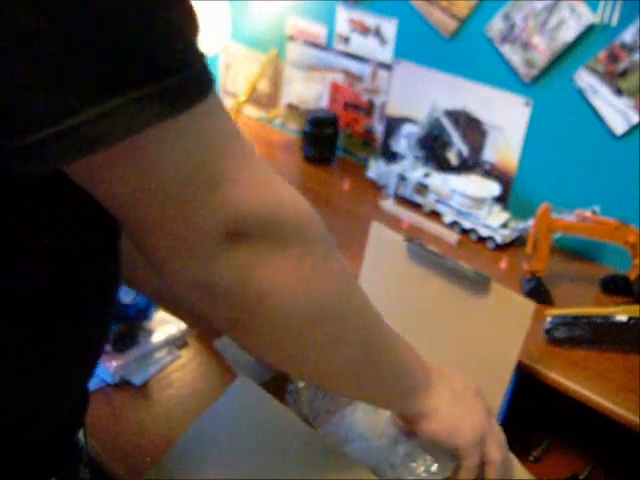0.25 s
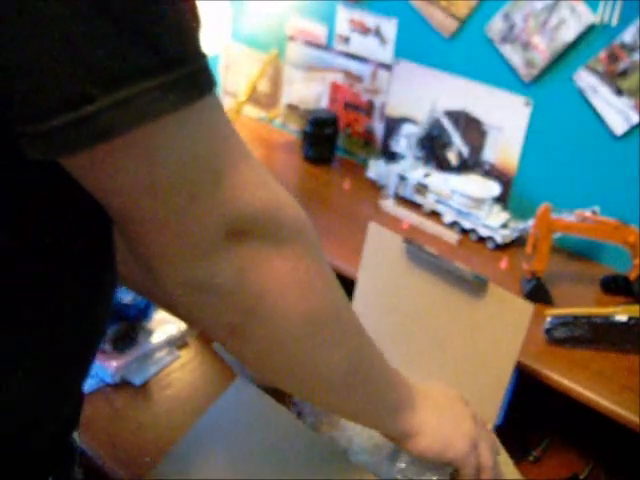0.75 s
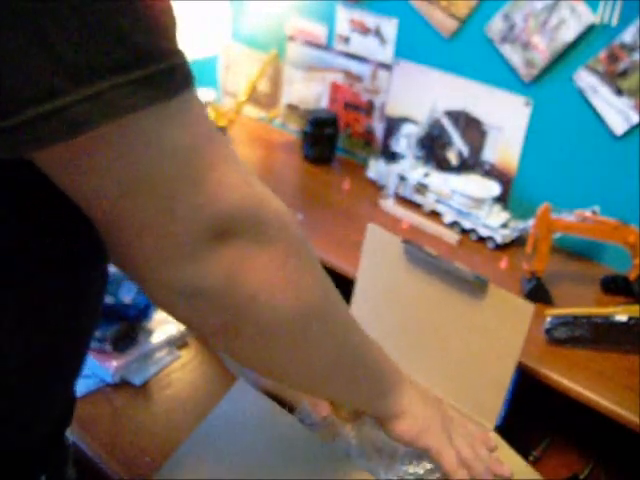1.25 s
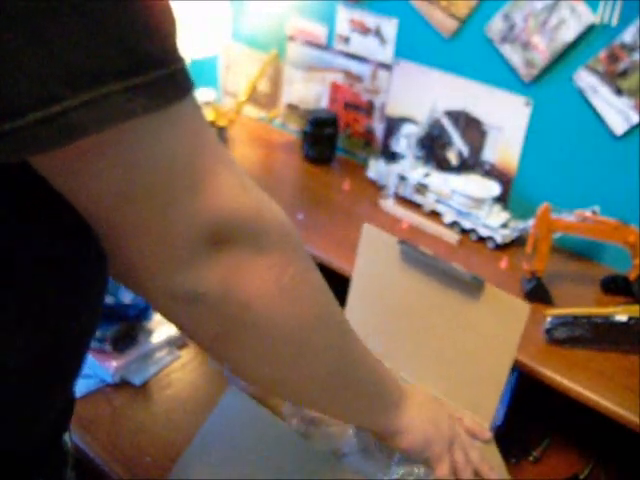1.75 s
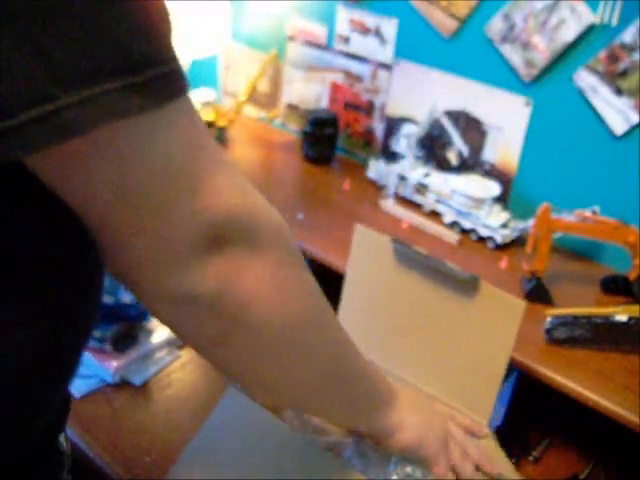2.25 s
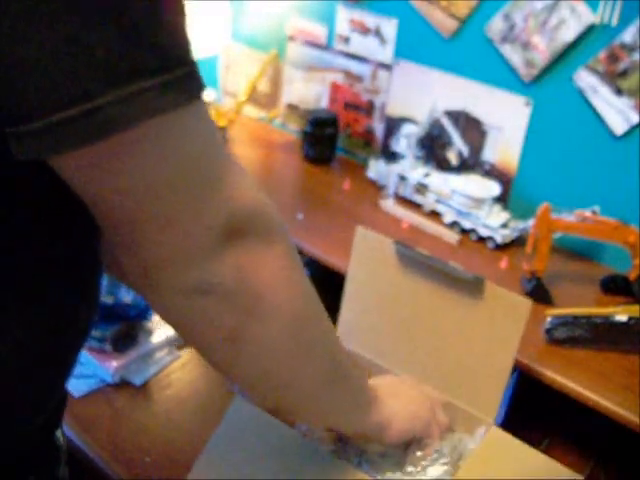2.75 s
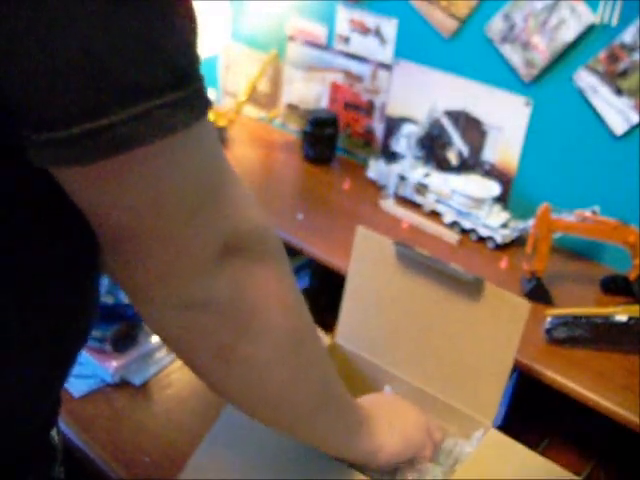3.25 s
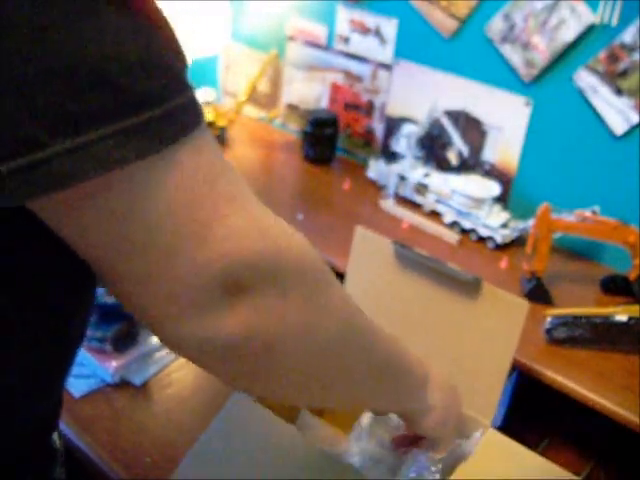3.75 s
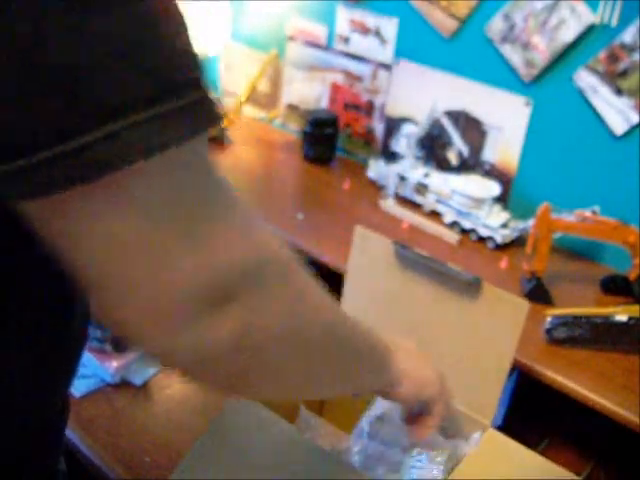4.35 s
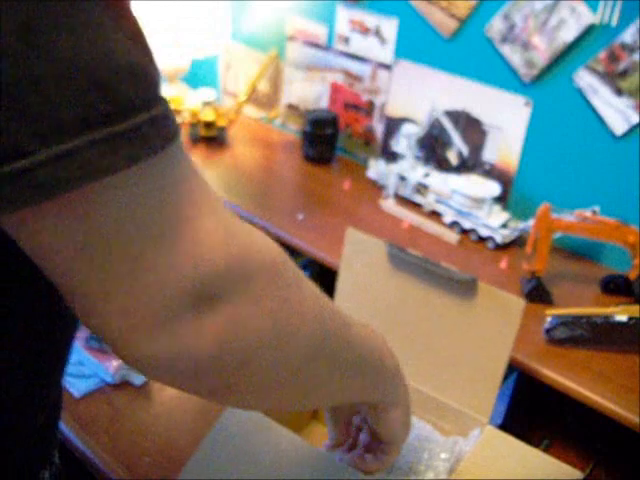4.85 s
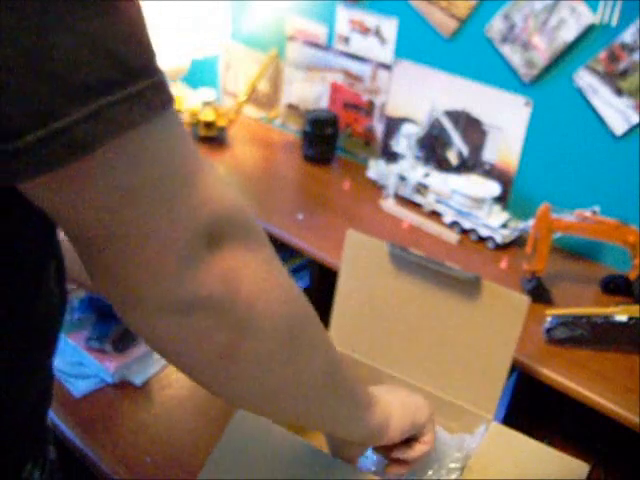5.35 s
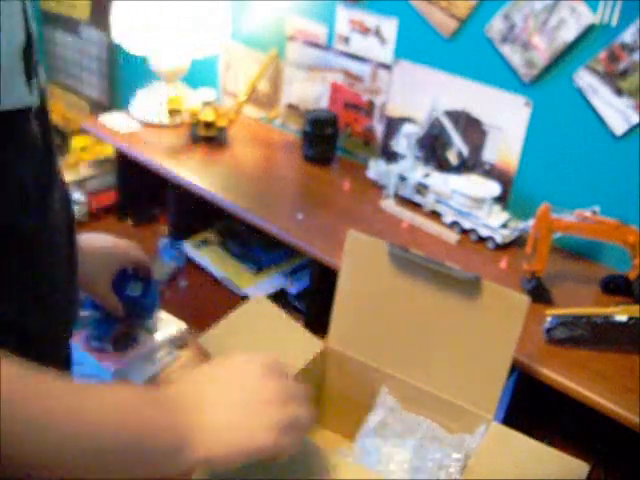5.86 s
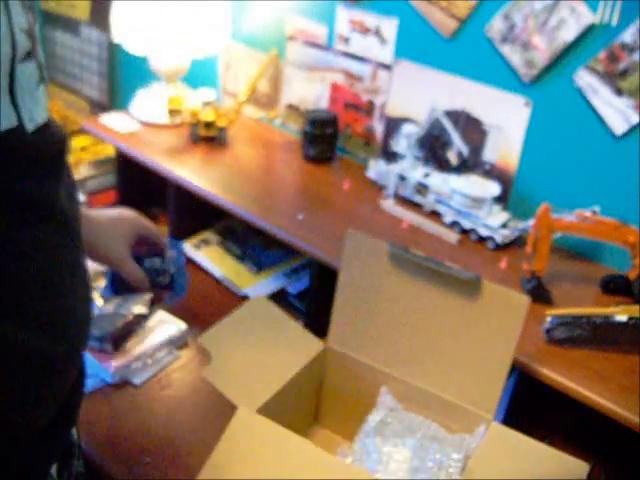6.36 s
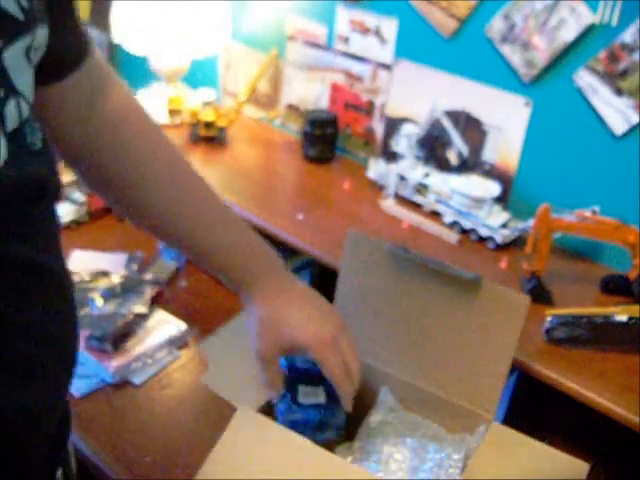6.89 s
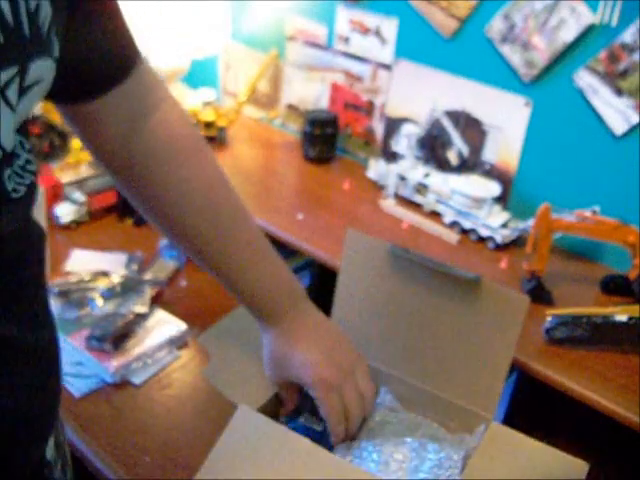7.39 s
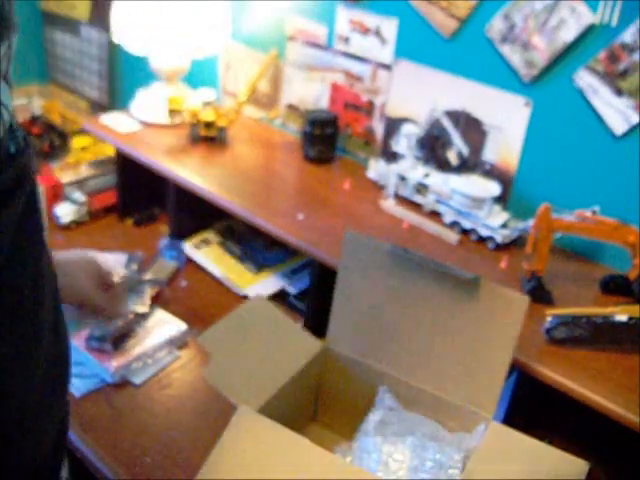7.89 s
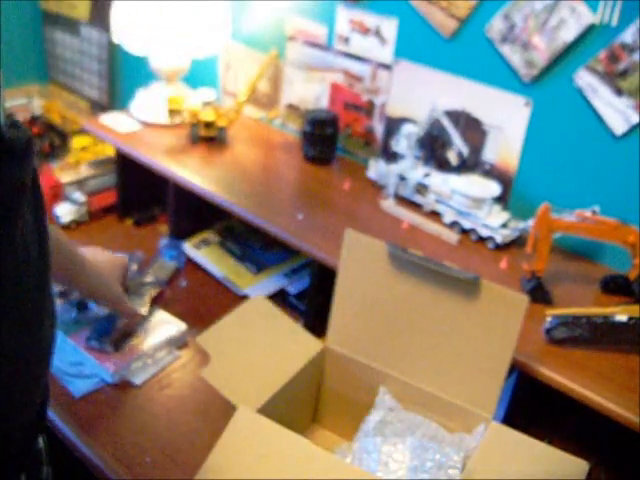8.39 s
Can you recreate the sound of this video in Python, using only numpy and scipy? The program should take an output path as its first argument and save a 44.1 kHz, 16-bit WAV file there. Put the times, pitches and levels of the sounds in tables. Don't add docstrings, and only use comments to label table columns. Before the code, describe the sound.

Plastic film creases and pops at arm's length, in uneven squeezes mixed with dull knuckle taps and rubbing on hollow cardboard. After a near-silent pause with only faint ticks, a crinkly packet touches the box, rustles, and lands with the loudest knock. A faint rustle ends it. Small bedroom, short reverberation, soft hiss and rumble, muffled top end.

```python
import sys
import numpy as np
from scipy import signal
from scipy.fft import rfft, irfft, next_fast_len
from scipy.io import wavfile
from scipy.ndimage import uniform_filter1d, map_coordinates

SR = 44100
rng = np.random.default_rng(int(sys.argv[2]) if len(sys.argv) > 2 else 0)


def generate_wav(signal):
    frames = np.transpose(np.atleast_2d(signal))
    scaled = np.clip(frames, -1, 1) * 32767
    pcm = np.round(scaled).astype(np.int16)
    wavfile.write(sys.argv[1], SR, pcm)


def makeup_ratio(level_db):
    decades = np.asarray(level_db, float) / 20
    return 10 ** decades


N = 380583


def unit(x):
    return x / np.sqrt(np.mean(x ** 2) + 1e-20)


def along(points, hz):
    f, v = np.transpose(points)
    return np.interp(np.log(hz + 1), np.log(f + 1), v)


def curve(rows):
    s, value = np.transpose(rows)
    return np.interp(np.arange(N) / SR, s, value)


def wobble(rate):
    return map_coordinates(rng.standard_normal(N // 100), [np.arange(N) * rate / SR])


def filtered(x, response):
    m = next_fast_len(N + SR // 2)
    return irfft(rfft(x, m) * response(np.fft.rfftfreq(m, 1 / SR)), m)[:N]


def resonances(modes):
    def response(f):
        total = 0
        for k, (c, w, db) in enumerate(modes):
            total = total + (-1) ** k * makeup_ratio(db) * 1j * f * w / (c * c - f * f + 1j * f * w)
        return total
    return response


def add_at(out, s, sound):
    out[round(s * SR):][:len(sound)] += sound


def hush():
    # (frequency [Hz], density [dB per Hz])
    floor = [(12, -36), (20, -0.5), (128, -10), (169, -12.5), (284, -19), (711, -29.5), (1140, -31),
             (1230, -31), (2280, -34), (7500, -39), (9750, -73), (16500, -120)]
    low_share = lambda f: 1 / (1 + (f / 350) ** 2)
    rumble = filtered(rng.standard_normal(N), lambda f: makeup_ratio(along(floor, f)) * np.sqrt(low_share(f)))
    hiss = filtered(rng.standard_normal(N), lambda f: makeup_ratio(along(floor, f)) * np.sqrt(1 - low_share(f)))
    rumble_db = -52 + 0.71 * wobble(4.5)
    return makeup_ratio(rumble_db) * unit(rumble) + makeup_ratio(-58) * unit(hiss)


def bedroom(x):
    # (frequency [Hz], t60 [s])
    decay = [(150, .25), (500, 0.36), (2000, 0.31), (5000, 0.25), (8000, 0.23)]
    out, hop = np.zeros(N + SR), SR // 8
    m = next_fast_len(hop + SR // 2 + 512)
    f = np.fft.rfftfreq(m, 1 / SR)
    evenness = 1 / (1 + (600 / (f + 1)) ** 2)

    def smooth_power(heard, width_hz):
        return np.abs(uniform_filter1d(np.abs(heard) ** 2, round(width_hz / f[1]))) + 1e-12

    for i in range(0, N, hop):
        hz, t, z = signal.stft(rng.standard_normal(SR // 2), SR, nperseg=256)
        fade = makeup_ratio(-60 * t / along(decay, hz)[:, None])
        tail = signal.istft(z * fade, SR, nperseg=256)[1]
        heard = rfft(x[i:i + hop], m)
        evened = heard * (smooth_power(heard, 1200) / smooth_power(heard, 120)) ** (evenness / 2)
        answer = irfft(evened * rfft(tail, m), m) / np.linalg.norm(tail)
        out[i + 130:][:m] += answer
    return out[:N]


def hums():
    # (time [s], length [s], pitch [Hz], peak [dB])
    held = [(.085, .035, 170, -42), (.31, .07, 208, -44), (4.617, .025, 465, -25), (4.537, .018, 1950, -27),
            (4.672, .02, 470, -38), (6.881, .012, 900, -30), (6.882, .01, 1250, -35),
            (6.882, .012, 1830, -33), (6.885, .015, 170, -33), (6.881, .014, 450, -31),
            (6.935, .02, 350, -36), (7.572, .01, 215, -27), (7.589, .008, 360, -30),
            (7.575, .008, 640, -30), (2.305, .03, 430, -42), (4.25, .012, 400, -41), (4.222, .03, 215, -40),
            (4.232, .012, 680, -41), (1.9345, .006, 880, -30), (1.951, .009, 830, -35),
            (1.963, .012, 740, -36), (3.27, .012, 200, -39), (3.288, .03, 460, -41)]
    out = np.zeros(N)
    for s, length, hz, db in held:
        t = np.arange(round(length * SR)) / SR
        level = makeup_ratio(db - 5 * t / length) * signal.windows.tukey(len(t), .4)
        add_at(out, s, level * np.sin(2 * np.pi * hz * t))
    return out


def pings():
    # (time [s], peak [dB], pitch [Hz], t60 [s])
    rings = [(.4955, -35, 1490, 0.054), (.5975, -18, 2810, 0.023), (.6755, -15, 1920, 0.025),
             (1.6185, -38, 1500, .04), (1.933, -34, 976, .04), (3.2375, -21.5, 1164, 0.038),
             (3.24, -30, 565, 0.052), (3.238, -32, 693, 0.058), (3.238, -29, 2860, .03),
             (4.2195, -33, 684, 0.038), (4.2195, -32, 331, 0.081), (4.55, -33, 1850, 0.039),
             (4.537, -27.5, 1530, 0.038), (5.373, -36.5, 720, 0.066), (5.515, -41.5, 480, 0.072),
             (5.61, -39, 648, 0.076), (5.602, -33.5, 1600, .05), (7.534, -35, 120, 0.17),
             (7.546, -24.5, 272, 0.063), (7.536, -20.5, 527, 0.048), (7.539, -16.5, 1037, 0.04),
             (7.545, -32, 1800, .1), (7.56, -29, 600, 0.066), (4.645, -38, 483, .07),
             (4.675, -38, 469, 0.06), (7.548, -20, 208, 0.13), (7.566, -28, 380, 0.04),
             (1.955, -37, 803, .06), (1.97, -41, 700, 0.06), (1.7, -38, 229, 0.093), (6.925, -34, 780, .04)]
    out, t = np.zeros(N + SR), np.arange(SR // 4) / SR
    for s, db, hz, t60 in rings:
        drift = 0.018 * np.cumsum(rng.standard_normal(len(t)))
        level = makeup_ratio(db - 60 * t / max(t60, .01)) * (1 - np.exp(-t / 0.0012))
        add_at(out, s, level * np.sin(2 * np.pi * hz * t + drift))
    return out[:N]


def box():
    # (frequency [Hz], width [Hz], level [dB])
    hollow_modes = [(131, 29, -5.5), (215.5, 36.4, -2), (268.7, 22.4, -1.5), (328, 32, 0), (455, 39, 0.5),
                    (556, 102, -5), (720, 60, -19.5)]
    # (frequency [Hz], width [Hz], level [dB])
    wall_modes = [(770, 340, -5.5), (1034, 160, -7), (1232, 130, -6.5), (1456, 91, -4), (1800, 380, -10.5)]
    # (time [s], level [dB])
    rubbing = [(0.0, -52), (.65, -51.5), (.81, -65), (1.37, -64.5), (1.63, -53.5), (2.45, -48.5),
               (2.71, -56), (3.51, -60), (4.45, -51.5), (5.12, -52), (5.57, -54.5), (6.3, -62), (6.87, -58),
               (7.33, -59), (7.55, -55), (7.79, -69), (8.32, -62.5), (8.63, -51.5)]
    # (time [s], peak [dB], pitch [Hz], hardness [dB], ring t60 [s])
    taps = [(.494, -23.5, 504, -7, 0.094), (.5965, -9.5, 477, -7, 0.065), (.608, -22, 467, 1, 0.11),
            (.638, -14.5, 427, -7, 0.058), (.674, -13, 439, -12, 0.082), (.689, -19, 438, -16, 0.08),
            (1.619, -37, 324, -5, 0.12), (1.731, -28.5, 432, -29, 0.047), (1.912, -28, 404, -8, .04),
            (1.934, -23.5, 770, -8, 0.08), (1.94, -29, 391, -15, 0.084), (2.288, -32.5, 520, 4.5, 0.14),
            (3.2369, -16.5, 444, -5, 0.053), (3.52, -29, 443, -9, 0.073), (4.065, -28, 470, -17, 0.043),
            (4.218, -14.5, 440, -13, 0.036), (4.619, -30, 463, -20, 0.1), (4.954, -32, 446, 0, 0.16),
            (5.371, -31.5, 532, -1, 0.095), (5.602, -34.5, 461, -8, .15), (7.533, -0.5, 354, -13, 0.038),
            (7.562, -15.5, 333, -19, 0.06)]
    # (time [s], peak [dB], pitch [Hz], hardness [dB], ring t60 [s])
    thuds = [(.025, -31, 358, -7, 0.068), (1.652, -25, 328, -12, 0.12), (1.675, -29, 327, -16, 0.1),
             (2.563, -29, 420, -14, 0.047), (2.965, -29, 455, -4.5, 0.045), (4.32, -30, 400, -8, .05),
             (4.357, -34.5, 432, -20, 0.073), (4.515, -32, 327, -5, 0.1), (6.883, -21, 440, -8, 0.04),
             (6.914, -20, 311, -12, 0.078), (6.89, -25, 169, -20, .2), (7.058, -31, 192, -14, 0.15),
             (7.326, -38.5, 900, 4, .07), (7.545, -19, 212, -22, 0.08), (7.59, -29, 330, -8, .05),
             (7.61, -22.5, 290, -8, .06)]
    hollow, walls = resonances(hollow_modes), resonances(wall_modes)
    panel, push, slap = np.zeros((3, N + SR))
    t = np.arange(SR // 4) / SR
    # (last column, dB)
    knocks = [(*row, -39) for row in taps] + [(*row, -10) for row in thuds]
    for s, db, hz, hard_db, t60, boom_db in knocks:
        shake = rng.standard_normal((2, len(t)))
        fade = makeup_ratio(-60 * t / max(t60, .01)) * (1 - np.exp(-t / 0.0016))
        boom = makeup_ratio(boom_db) * np.sin(2 * np.pi * 205 * t) * makeup_ratio(-60 * t / 0.097)
        ring = np.sin(2 * np.pi * hz * t + 0.015 * np.cumsum(shake[0])) * fade ** 1.19
        add_at(panel, s, makeup_ratio(db - 5.5) * (ring + boom))
        add_at(push, s, makeup_ratio(db + 5.5) * shake[0] * fade)
        add_at(slap, s, makeup_ratio(db + hard_db + 10.5) * shake[1] * fade)
    scuff = rng.standard_normal(N) * makeup_ratio(1.5 * wobble(30))
    rub = unit(filtered(scuff, hollow) + 0.48 * filtered(scuff, walls))
    knocking = panel[:N] + filtered(push[:N], hollow) + filtered(slap[:N], walls)
    return knocking + makeup_ratio(curve(rubbing) - 2.5) * rub


def slides():
    # (time [s], length [s], pitch [Hz], width [Hz], level [dB])
    swishes = [
        (4.545, 0.031, 1800, 600, -40.5),
        (5.81, .17, 5100, 390, -52),
        (5.82, 0.28, 2200, 420, -58.5),
        (4.495, 0.1, 480, 560, -41),
        (7.425, 0.077, 4100, 1500, -45.5),
        (7.275, .03, 3700, 1600, -47),
        (7.495, 0.026, 2200, 990, -42.5),
        (7.33, 0.045, 950, 1000, -41.5),
        (6.89, 0.06, 800, 200, -48),
    ]
    out = np.zeros(N)
    for s, length, hz, width_hz, db in swishes:
        n = round(length * SR)
        band = signal.butter(1, [hz - width_hz / 2, hz + width_hz / 2], "band", fs=SR)
        noise = unit(signal.lfilter(*band, rng.standard_normal(SR // 2)))
        add_at(out, s, makeup_ratio(db) * noise[:n] * signal.windows.tukey(n, .5))
    return out


def flicks():
    # (time [s], peak [dB], pitch [Hz])
    flips = [(0.183, -30, 4600), (0.2869, -32, 6400), (0.3146, -33, 4600), (0.3343, -32, 5800),
             (0.9059, -35, 5000), (0.9214, -32, 6200), (0.9993, -32, 6400), (1.0344, -29, 5300),
             (1.05, -33, 2200), (1.2262, -33, 5800), (1.2436, -34, 5100), (1.3119, -31, 5200),
             (1.3436, -27, 5700), (1.568, -34, 1800), (1.6058, -27, 4700), (1.9115, -28, 5300),
             (2.0677, -32, 5300), (2.1786, -27, 5900), (2.3434, -16, 4500), (2.9031, -29, 6300),
             (2.9837, -26, 4200), (3.0276, -22, 5200), (3.5379, -31, 3600), (3.5719, -26, 5200),
             (3.6278, -26, 4200), (3.684, -30, 4600), (3.8464, -27, 5100), (4.0312, -36, 3900),
             (4.2319, -31, 4400), (4.4915, -21, 5800), (4.672, -24, 5400), (4.785, -23, 5500),
             (4.806, -24, 5500), (4.8245, -25, 5100), (4.8665, -28, 2600), (4.9564, -19, 3500),
             (5.4268, -30, 5000), (5.4575, -30, 5800), (5.5559, -31, 5600), (5.822, -35, 6300),
             (7.533, -17, 6000), (7.536, -19, 5600)]
    out, t = np.zeros(N + SR), np.arange(SR // 200) / SR
    for s, db, hz in flips:
        add_at(out, s, makeup_ratio(db + 1.5) * np.sin(2 * np.pi * hz * t) * np.exp(-hz * t / 1.6))
    return out[:N]


def hand():
    # (peak time [s], crackle [dB], build-up [s], die-away [s])
    squeezes = [(0.0, -36.5, .05, .12), (.1, -42.5, 0.15, 1.5), (.46, -40.5, 0.18, 0.46),
                (.6, -41.5, 0.046, 0.13), (.82, -44, .05, .08), (1.0, -42, 0.23, 0.31),
                (1.34, -41, 0.26, 0.54), (1.61, -39.5, 0.067, 0.67), (1.95, -36, 0.14, 0.046),
                (2.35, -33, 0.45, 0.28), (2.43, -33, 0.036, 0.036), (2.58, -24.5, 0.047, 0.045),
                (2.8, -44, 0.66, 1.2), (3.0, -34, 0.14, 0.26), (3.24, -36.5, 0.012, 0.14),
                (3.559, -40, 0.085, 0.47), (3.75, -41, 0.083, 0.45), (3.87, -40, 0.19, 0.14),
                (4.06, -39, 0.022, 0.19), (4.35, -33.5, 0.13, 0.089), (4.49, -29.5, 0.016, 0.52),
                (4.76, -32.5, 0.089, 0.16), (4.97, -27, 0.089, 0.15), (5.07, -26, 0.041, 0.065),
                (5.31, -40.5, 0.28, 0.086), (5.38, -38, 0.021, 0.24), (5.53, -42.5, 0.025, 0.31),
                (5.6, -30.5, 0.035, 0.059), (5.82, -46, 0.059, 0.3), (5.96, -42.5, .03, 0.087)]
    # (peak time [s], crackle [dB], build-up [s], die-away [s])
    grips = [
        (6.9, -43, 0.11, 0.24),
        (7.041, -54, 0.019, 0.29),
        (7.11, -44, 0.12, 0.46),
        (7.33, -40, 0.02, 0.091),
        (7.47, -44, 0.089, .15),
        (7.55, -40, .11, 0.014),
        (7.62, -51, 0.14, 0.081),
        (8.39, -49, 0.024, 1.4),
        (8.61, -38, 0.14, 0.035),
    ]
    # (time [s], coarse crackle at the pivot [dB])
    bulk = [(0.0, -45.5), (.36, -52), (.6, -47), (.8, -63), (1.05, -48), (1.4, -56), (1.65, -50.5),
            (2.3, -51), (3.0, -52.5), (3.6, -50.5), (3.95, -56), (4.4, -51.5), (5.2, -52.5), (5.55, -50),
            (5.85, -52), (6.9, -46), (7.55, -49.5), (8.5, -46)]
    t = np.arange(N) / SR
    power = makeup_ratio(2 * -70)
    for s, db, rise, fall in squeezes + grips:
        away = np.maximum((s - t) / max(rise, .005), (t - s) / max(fall, .01))
        power = power + makeup_ratio(2 * (db - 20 * away))
    fine_db = 10 * np.log10(power)
    coarse_db = curve(bulk) + 0.98 * (fine_db + 45)
    return fine_db, coarse_db


def creases(spectrum, centre_hz, density, spread_db, cycles, clump_db, smooth_db):
    draw = rng.random((30000, 4))
    draw = draw[draw[:, 3] < density * N / SR / len(draw)]
    start = (draw[:, 0] * N).astype(int)
    hz = np.clip(centre_hz * np.exp(1.324 * (draw[:, 1] - .5)), 200, 9000)[:, None]
    size = makeup_ratio(-spread_db * np.log(draw[:, 2] + .035))[:, None]
    n = np.arange(96)
    folds = size * np.sin(2 * np.pi * hz * n / SR) * np.exp(-n * hz / SR / cycles)
    folds = folds * np.sqrt(hz)
    grains = np.bincount((start[:, None] + n).ravel(), folds.ravel(), N + 96)[:N]
    grains = unit(filtered(grains, lambda f: makeup_ratio(0.24 * along(spectrum, f))))
    blur = unit(filtered(rng.standard_normal(N), lambda f: makeup_ratio(along(spectrum, f))))
    clumps = makeup_ratio(clump_db * (.3 * wobble(25) + wobble(110)))
    return unit((grains + makeup_ratio(smooth_db) * blur) * clumps)


def crackle():
    # (frequency [Hz], density [dB per Hz])
    fine_spectrum = [(1500, -37), (3000, -18), (4500, -7), (6000, -2), (7500, 0)]
    # (frequency [Hz], density [dB per Hz])
    coarse_spectrum = [(400, -34.5), (1000, -13), (2000, 1), (3000, 4.5), (4500, -37.5), (7500, -11)]
    fine_db, coarse_db = hand()
    fine = creases(fine_spectrum, centre_hz=6020, density=1300, spread_db=2.8, cycles=2.07,
                   clump_db=2.4, smooth_db=-4.5)
    coarse = creases(coarse_spectrum, centre_hz=2750, density=1200, spread_db=3.5, cycles=0.88,
                     clump_db=2.0, smooth_db=0.0)
    return makeup_ratio(fine_db - 1.5) * fine + makeup_ratio(coarse_db - 5.0) * coarse


def snaps():
    # (time [s], peak [dB], pitch [Hz], depth [dB])
    big_folds = [(0.4957, -23.5, 1450, -21), (0.5971, -16.5, 2420, -3), (0.6101, -10.5, 4130, -1.5),
                 (.6393, -11.5, 3800, -6), (0.6745, -10, 4730, -4), (0.6904, -13.5, 4000, 0),
                 (1.592, -28, 5900, -5), (1.6186, -23, 1530, -10), (1.9315, -25.5, 1650, -14),
                 (2.008, -28, 3360, -4), (2.291, -16, 3070, -12), (2.429, -32, 1950, 1.5),
                 (3.237, -9.5, 4480, 1.5), (3.495, -41, 3000, 3), (3.5462, -22, 3300, -9.5),
                 (3.6146, -26, 5500, -3), (4.055, -20, 3600, -23), (4.066, -24, 2680, 3),
                 (4.218, -28, 1560, -5.5), (4.322, -16.5, 7360, -10), (4.489, -23.5, 6300, -10),
                 (4.5113, -22, 5800, -3), (4.541, -34.5, 2530, -22), (4.6185, -15, 5370, -14),
                 (4.981, -22, 4040, -5), (5.3725, -18.5, 3340, -10), (5.6017, -17.5, 3250, -10),
                 (5.96, -22.5, 2800, -16), (3.3843, -32, 3480, -27)]
    # (time [s], peak [dB], pitch [Hz], depth [dB])
    wrapper = [(6.1984, -38.5, 1550, -18), (6.232, -42, 7000, -24), (6.2426, -38, 6000, -18),
               (6.332, -43, 6500, -25), (6.405, -43, 7200, -25), (6.4677, -40.5, 5210, -26),
               (6.8825, -24, 2870, 2), (6.926, -25.5, 4450, -12), (6.9685, -24, 4800, -13),
               (7.0432, -23, 5350, -21), (7.0514, -24, 5000, -15), (7.0972, -27, 5330, -29),
               (7.1032, -21.5, 5030, -32), (7.206, -34, 5500, -21), (7.1196, -23.5, 3760, -28),
               (7.157, -23, 4550, -19), (7.22, -23, 5300, -12), (7.3286, -23.5, 3070, -8.5),
               (7.5004, -20.5, 6620, -19), (7.532, -19, 2400, -5), (7.5396, -11.5, 2900, 2),
               (7.611, -21.5, 1390, 5), (8.3841, -30.5, 3400, -10), (8.607, -31.5, 3000, -15)]
    # (time [s], peak [dB], pitch [Hz])
    small = [(0.2442, -24.5, 4360), (.37, -32, 3460), (0.7956, -31, 6500), (.9433, -31, 5030),
             (0.988, -29, 6750), (1.3597, -25.5, 4000), (1.769, -27, 6740), (2.3421, -21, 3940),
             (2.358, -22.5, 6200), (2.414, -21.5, 6960), (2.561, -12.5, 6700), (2.582, -14.5, 5200),
             (2.652, -11, 6800), (2.7202, -26, 4400), (2.755, -25.5, 5100), (2.766, -28, 3600),
             (2.808, -33, 5250), (2.8267, -21, 7160), (2.8634, -20, 5690), (3.014, -19.5, 7400),
             (3.0924, -20.5, 5230), (3.1192, -24.5, 4080), (3.153, -23.5, 6730),
             (3.717, -18, 6940), (3.7214, -19, 6600), (3.792, -24, 4340), (3.8625, -21, 5900),
             (3.9152, -23, 7140), (3.9854, -25, 7540), (3.9963, -26.5, 6240), (4.2625, -30, 4880),
             (4.445, -37, 6300), (4.355, -19.5, 6870), (4.4986, -14.5, 6670), (4.6594, -22.5, 5000),
             (4.727, -19, 5340), (4.7516, -22, 5250), (4.8907, -18.5, 5950), (4.9562, -20.5, 4450),
             (5.0674, -18, 4360), (5.32, -30, 4000), (5.567, -23, 5400), (5.805, -38, 4000),
             (.26, -31, 6040), (0.811, -34, 6500), (2.0562, -36, 7250), (2.1066, -33, 3390),
             (2.146, -26, 7220), (2.203, -25.5, 5000), (2.269, -30, 5000), (2.323, -24, 6500),
             (2.37, -25.5, 3480), (2.434, -22, 5950), (2.508, -26, 6530), (2.5391, -32, 4520),
             (2.571, -22, 6500), (2.576, -20, 6800), (2.592, -18, 5500), (2.604, -23, 6000),
             (2.9508, -26, 5180), (2.9933, -26, 6620), (3.199, -38, 7120), (3.231, -37, 3500),
             (3.244, -16.5, 4400), (3.263, -20.5, 4450), (3.27, -29, 5970), (3.332, -32, 6500),
             (4.2928, -30, 5600), (5.195, -35, 5100), (5.2162, -34, 4460), (5.2616, -30, 4000),
             (6.815, -39, 4810), (6.8583, -35, 3100), (6.9757, -24, 4500), (7.4284, -41, 4800),
             (7.4578, -35, 4260), (7.507, -30, 2500), (7.514, -33, 2000), (4.549, -20.5, 3500),
             (4.7545, -20.5, 4500), (5.015, -22, 5500), (5.024, -24, 4000), (5.072, -21, 4500),
             (6.877, -30, 5500), (7.082, -32, 4500), (7.131, -28, 4000), (7.138, -28, 4500),
             (7.154, -26, 5500), (7.2155, -31.5, 5000), (7.258, -32, 4500), (7.278, -34, 6500)]
    events = [(*row, 0.0092, 0.11) for row in big_folds + wrapper]
    events += [(*row, -31, 0.0052, .04) for row in small]
    out, t = np.zeros(N + SR), np.arange(SR // 20) / SR

    def band(x, lo_hz, hi_hz):
        return unit(signal.lfilter(*signal.butter(2, [lo_hz, min(hi_hz, 12000)], "band", fs=SR), x))

    for s, db, hz, depth_db, t60, rustle in events:
        tear = rng.standard_normal((3, len(t)))
        fade = makeup_ratio(-60 * t / max(t60, .002)) + rustle * makeup_ratio(-60 * t / 0.057)
        fade = fade * (1 - np.exp(-t / 0.00036))
        crack = 0.72 * band(tear[0], hz * 0.51, hz * 1.69)
        ring = 0.33 * band(tear[1], hz * 0.91, hz * 1.22)
        flex = makeup_ratio(depth_db - 0.5) * band(tear[2], 605, 3700)
        tick = 0.89 * np.sin(2 * np.pi * hz * t) * np.exp(-hz * t / 2.9)
        snap = 1.12 * fade * (crack + ring) + tick
        add_at(out, s, makeup_ratio(db - 2.0) * (snap + 1.22 * fade * flex) / np.abs(snap).max())
    return out[:N]


def scene():
    board = box() + pings() + hums()
    film = crackle() + snaps() + slides() + flicks()
    return (film + board + bedroom(makeup_ratio(-6.5) * (film + board)) + hush())[None]


def band_limit(x):
    return signal.sosfilt(signal.butter(12, 8540, fs=SR, output="sos"), x)


def record(dry):
    # (frequency [Hz], level [dB])
    band_edges = [(18, -5), (40, 0), (7400, 1), (7750, -9), (8000, -23), (8250, -37.5), (8550, -59),
                  (10000, -75)]
    soft = dry[0] / (1 + np.abs(dry[0] / .38) ** 3) ** (1 / 3)
    mix = filtered(soft, lambda f: makeup_ratio(along(band_edges, f)))[None]
    return band_limit(mix)


dry = scene()
out = record(dry)
generate_wav(out)
```